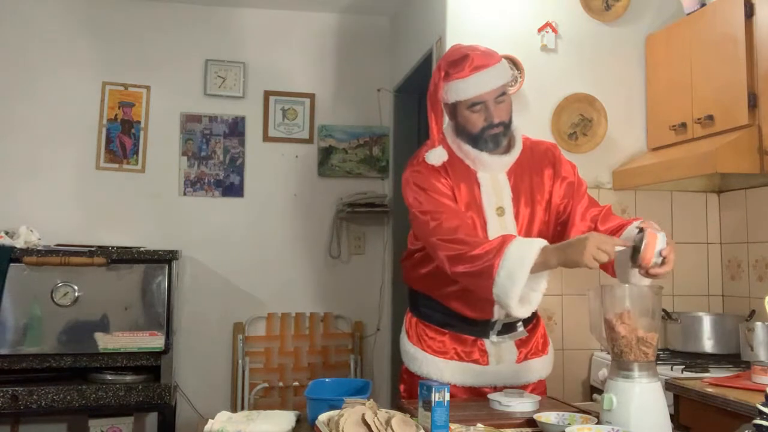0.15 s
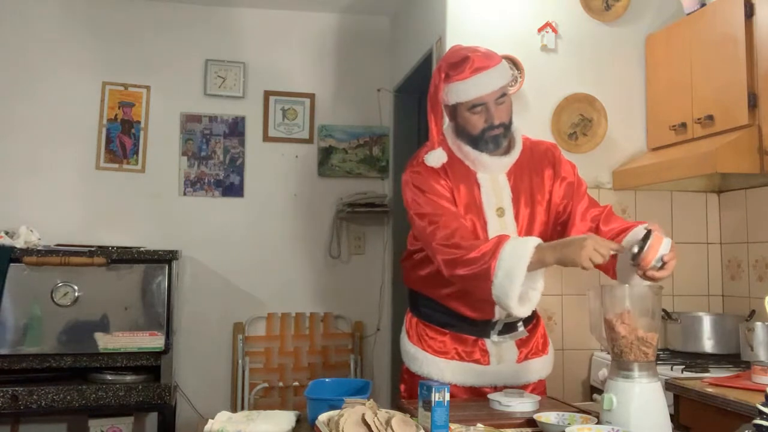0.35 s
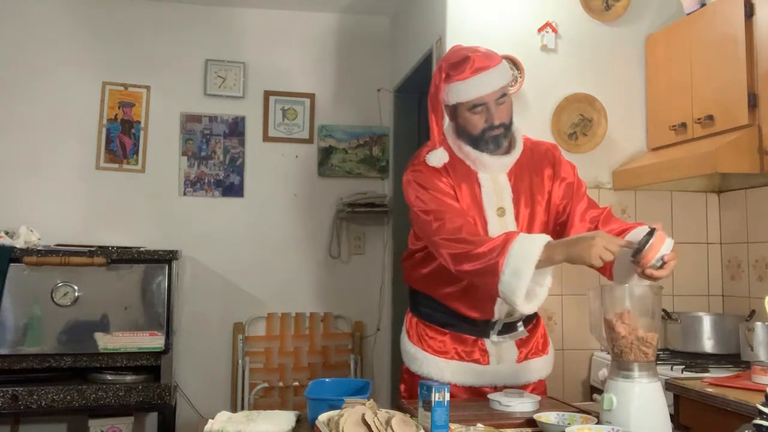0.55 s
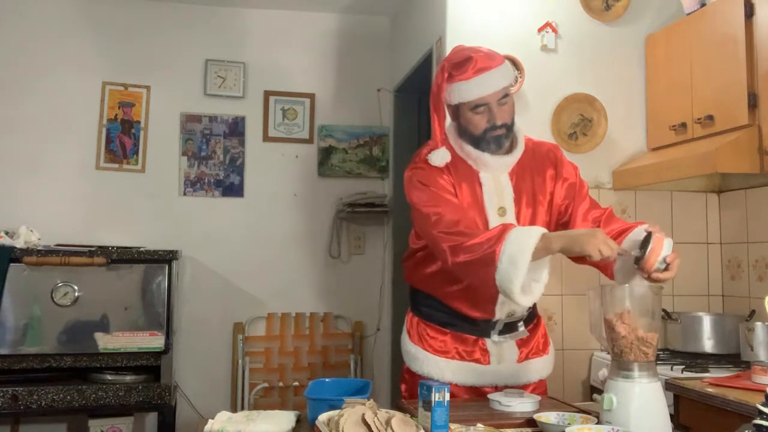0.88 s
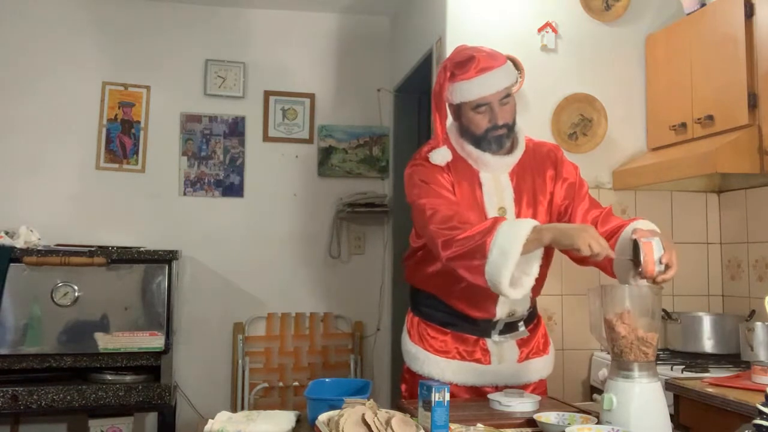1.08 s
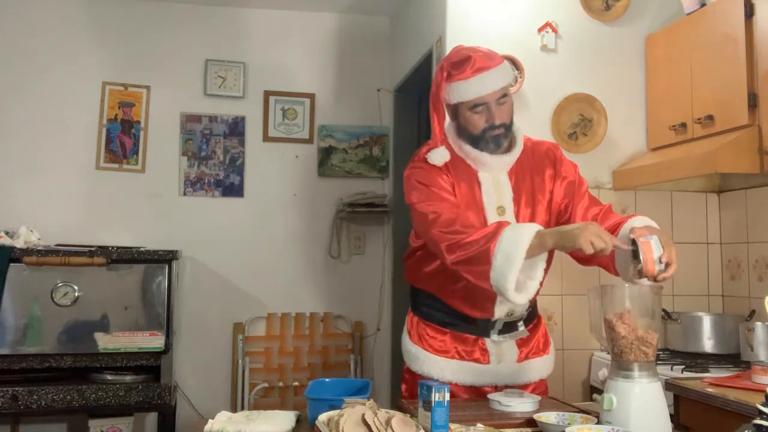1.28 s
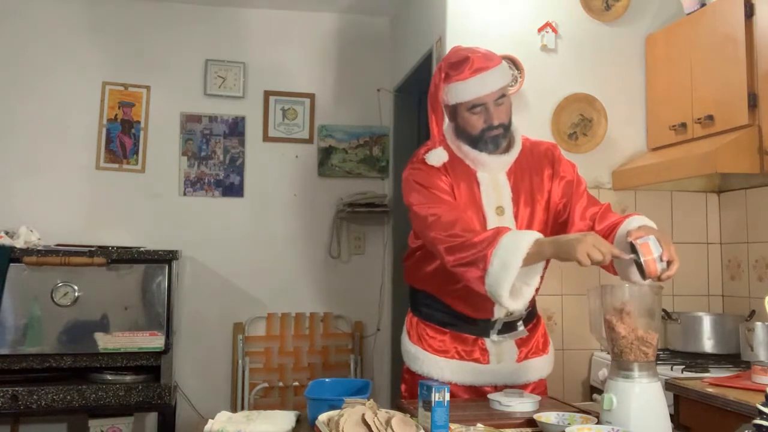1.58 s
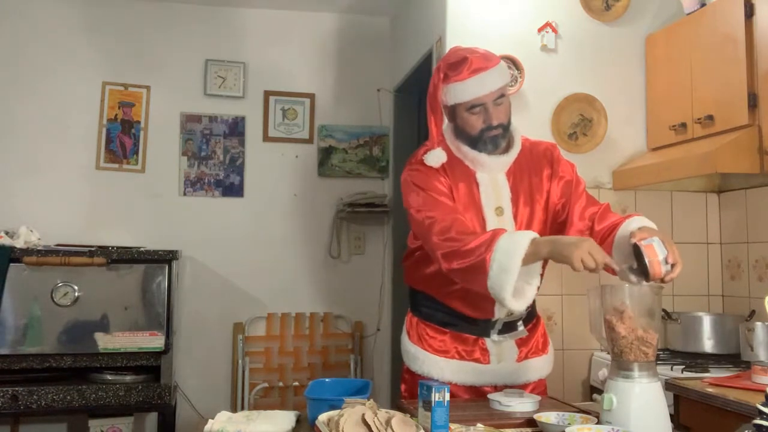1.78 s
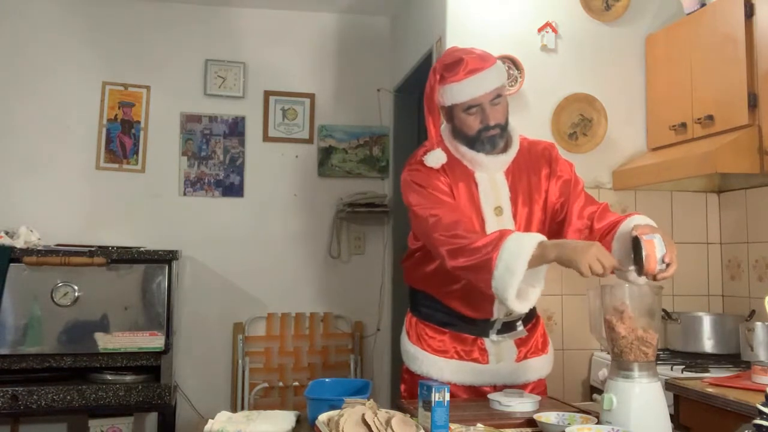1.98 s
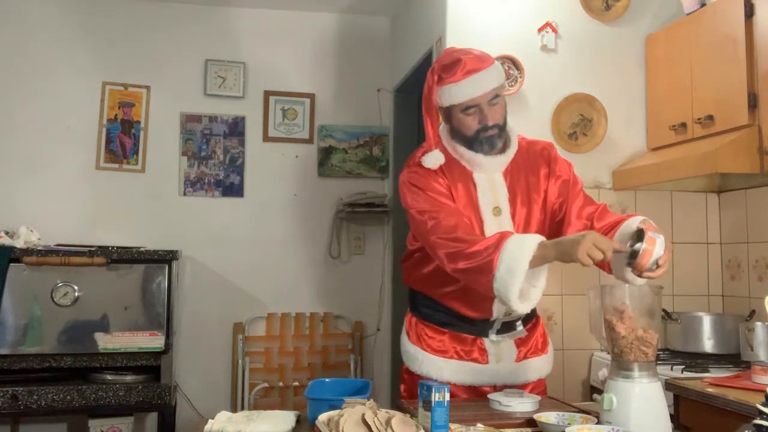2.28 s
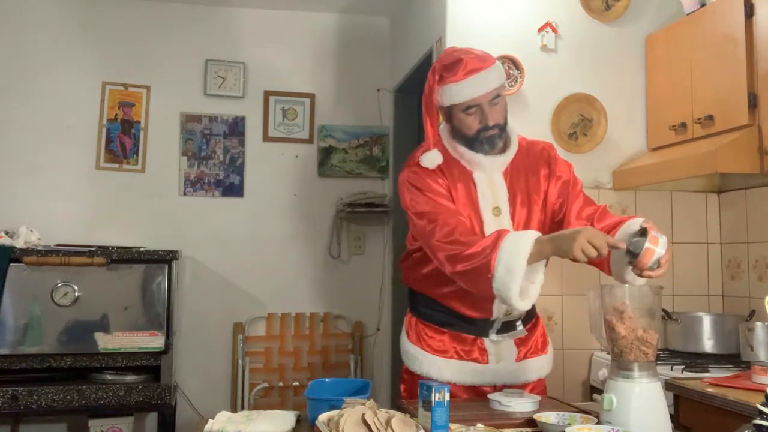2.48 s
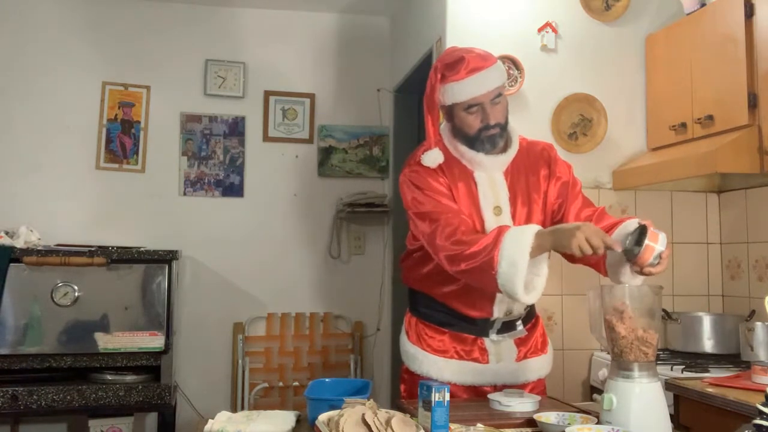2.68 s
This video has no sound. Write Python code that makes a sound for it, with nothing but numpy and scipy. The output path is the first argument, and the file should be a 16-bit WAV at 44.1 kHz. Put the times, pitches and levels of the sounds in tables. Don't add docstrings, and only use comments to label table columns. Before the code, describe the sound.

A metal spoon knocks a hand-held tin can at 0.15 and 0.52 seconds, each followed by a short scrape, then cracks against the seam at 0.8. Soft scooping comes near 1.3, a light wall brush at 1.65, a bump at 1.93, and a loud bright rim blow with a skid at 2.35. Tiles echo briefly over faint air and motor hum; the distant small microphone dulls the top.

```python
import sys
import numpy as np
from scipy import signal
from scipy.io import wavfile
from scipy.ndimage import uniform_filter1d

SR = 44100
rng = np.random.default_rng(int(sys.argv[2]) if len(sys.argv) > 2 else 0)


def digitize_waveform(pressure):
    field = np.atleast_2d(pressure).T
    bounded = np.clip(field, -1, 1)
    quanta = np.round(bounded * 32767).astype(np.int16)
    wavfile.write(sys.argv[1], SR, quanta)


def magnitude_from_level(level_db):
    exponent = np.asarray(level_db, float) / 20
    return 10 ** exponent


N = 125685
PIVOT_HZ = 1160


def evened(x):
    return x / np.sqrt(np.mean(x ** 2) + 1e-20)


def read(points, hz):
    f, value = np.transpose(points)
    return np.interp(np.log(hz + 1), np.log(f + 1), value)


def add(mix, s, sound):
    part = mix[round(s * SR):][:len(sound)]
    part += sound[:len(part)]


def colour(x, points, tilt_db=0):
    hz = abs(np.fft.fftfreq(4096, 1 / SR))
    gain_db = read(points, hz) + tilt_db * np.log2((hz + 50) / PIVOT_HZ)
    log_gain = np.log(magnitude_from_level(gain_db))
    taps = np.fft.ifft(np.exp(np.conj(signal.hilbert(log_gain)))).real[:2048]
    return signal.oaconvolve(x, taps)[:len(x)]


# pitch in Hz, level in dB per Hz.
AIR_SPECTRUM = [(30, -16), (70, -12), (170, -2.5), (400, -10.5), (1200, -18.5), (3000, -28), (5500, -31.5),
                (7000, -35)]


def house_air():
    level_db, patch_db = -61.5, 1
    frames, hz = N // 512 + 5, np.fft.rfftfreq(2048, 1 / SR)
    a, b, patches = rng.standard_normal((frames, 1025, 3)).T
    patches = uniform_filter1d(patches, size=10, axis=0)
    patches = evened(uniform_filter1d(patches, size=10, axis=1))
    size = magnitude_from_level(read(AIR_SPECTRUM, hz)[:, None] + patch_db * patches)
    air = signal.istft((a + 1j * b) * size, nperseg=2048, noverlap=1536)[1][:N]
    return magnitude_from_level(level_db) * evened(air)


# pitch in Hz, width of its wavering in Hz, level in dB.
HUM_TONES = [(101, 7.3, -70.5), (188.5, 5.1, -71), (310.4, 3.6, -70.5), (141, 1.5, -76.5)]


def appliance_hum():
    out = np.zeros(N)
    for hum_hz, width_hz, db in HUM_TONES:
        r = np.exp(-np.pi * width_hz / SR)
        p, q = rng.standard_normal((N, 2)).T
        slow = signal.lfilter([1], np.convolve([1, -r], [1, -r]), p + 1j * q)
        tone = (slow * np.exp(2j * np.pi * hum_hz * np.arange(N) / SR)).real
        out += magnitude_from_level(db) * evened(tone)
    return out


# pitch in Hz, time to fall by 60 dB in seconds.
KITCHEN_DECAY = [(200, 1), (1000, 0.55), (3000, 0.53), (7000, 0.47), (14000, 0.35)]


def kitchen_echoes():
    early_db, early_t60_s = 1.5, 0.17
    level_db, first_echo_s = -1.5, 0.004
    taps = np.zeros(SR)
    at = np.arange(0, SR - 8, 8)
    taps[at + rng.integers(0, 8, len(at))] = rng.choice([-1., 1.], len(at))
    hz, t, z = signal.stft(taps, SR, nperseg=256)
    late = magnitude_from_level(-60 * t / read(KITCHEN_DECAY, hz)[:, None])
    early = magnitude_from_level(early_db - 60 * t / early_t60_s)
    tail = signal.istft(z * (late + early), SR, nperseg=256)[1]
    return np.r_[np.zeros(round(first_echo_s * SR)), magnitude_from_level(level_db) * tail / np.linalg.norm(tail)]


# pitch in Hz, level in dB.
CRACK_SPECTRUM = [(60, -74.5), (200, 0.5), (500, 4), (1200, 8.5), (3000, 8.5), (6000, 6.5), (10000, -2.5),
                  (16000, 11)]


def crack(burst, tilt_db):
    return colour(burst, CRACK_SPECTRUM, tilt_db)


def ring(modes, tilt_db, rise_s, damping=1):
    sag_share, sag_s = 0.00794, 0.04
    t = np.arange(0, .45, 1 / SR)[:, None]
    hz, db, t60 = np.transpose(modes)
    size = magnitude_from_level(db + tilt_db * np.log2(hz / PIVOT_HZ) - 60 * t / (damping * t60))
    bent = t - sag_share * sag_s * np.exp(-t / sag_s)
    tones = size * np.sin(2 * np.pi * hz * bent + np.arange(len(hz)) ** 2)
    return tones.sum(1) * np.minimum(t[:, 0] / rise_s, 1)


def knock(modes, s, ring_db, crack_db, tilt_db, rise_s):
    crack_t60_s = 0.039
    t = np.arange(0, .45, 1 / SR)
    burst = rng.standard_normal(len(t)) * magnitude_from_level(-60 * t / crack_t60_s) * np.minimum(t / rise_s, 1)
    return s, magnitude_from_level(ring_db) * ring(modes, tilt_db, rise_s) + magnitude_from_level(crack_db) * crack(burst, tilt_db)


def drag(modes, s, length_s, ring_db, rasp_db, tilt_db):
    slips_per_s, spread_db, slip_rise_s = 2500, 3.2, 0.00078
    damping, peak, swell = 0.29, 0.86, 1.17
    sign, luck, chance = rng.random((8000, 3)).T
    slips = np.sign(sign - .5) * magnitude_from_level(-spread_db * np.log(luck + 0.014))
    slips = slips * (chance < slips_per_s / SR)
    progress = np.clip(np.arange(8000) / SR / length_s, 0, 1)
    stroke = abs(np.sin(np.pi * progress ** peak)) ** swell
    slips = np.pad(evened(slips) * stroke, (0, 4000))
    body = ring(modes, tilt_db, slip_rise_s, damping)
    rung = signal.fftconvolve(slips, body / np.linalg.norm(body))[:len(slips)]
    return s, magnitude_from_level(ring_db) * rung + magnitude_from_level(rasp_db) * crack(slips, tilt_db)


def touches(modes, knocks, drags=()):
    out = np.zeros(N)
    for row in knocks:
        add(out, *knock(modes, *row))
    for row in drags:
        add(out, *drag(modes, *row))
    return out


# pitch in Hz, level in dB, time to fall by 60 dB in seconds.
SCOOP_MODES = [(584, -9, 0.013), (1084, 6, 0.029), (1242, -2.5, 0.043), (1380, -5, 0.062), (2062, -6, 0.1),
               (2600, 2.5, 0.03), (3750, 1, 0.024), (4800, -9, 0.034)]
# start in seconds, ring in dB, crack in dB, brightness in dB per octave, rise in seconds.
SCOOP_TAPS = [
    (1.296, -62, -70, -6, 0.0011),
    (1.316, -45, -64, -9, 0.0014),
    (1.326, -52, -59, 1, 0.00075),
    (1.34, -52, -68, 3.5, .001),
    (1.362, -51.5, -70, -17, 0.0012),
    (1.385, -62, -70, -3, .0008),
]
# start and length in seconds, ring in dB, rasp in dB, brightness in dB per octave.
SCOOP_SCRAPES = [
    (1.285, 0.041, -61.5, -65, -12),
    (1.3, 0.072, -47, -55.5, -5.5),
    (1.325, 0.028, -44, -60, 0.5),
    (1.35, 0.049, -76, -61.5, -1.5),
]


def scoop():
    return touches(SCOOP_MODES, SCOOP_TAPS, SCOOP_SCRAPES)


# pitch in Hz, level in dB, time to fall by 60 dB in seconds.
TIP_MODES = [(1200, -18.5, .015), (2500, -4, .015), (3300, -3.5, .02), (3200, -16.5, .015), (5660, -3, .02),
             (5760, 4.5, .015), (6500, -11, .012)]
# start in seconds, ring in dB, crack in dB, brightness in dB per octave, rise in seconds.
TIP_TICKS = [
    (0.4866, -40, -40.5, 0.49, 0.00025),
    (0.7843, -40.5, -47, 0.66, 0.0003),
]


def tip():
    return touches(TIP_MODES, TIP_TICKS)


# pitch in Hz, level in dB, time to fall by 60 dB in seconds.
BOWL_MODES = [(960, 6, 0.031), (1067, 5.5, 0.051), (3954, -0.5, 0.057), (4730, -17, 0.026),
              (2870, -4.5, 0.06)]
# start in seconds, ring in dB, crack in dB, brightness in dB per octave, rise in seconds.
BOWL_BUMPS = [
    (0.606, -28, -44, -7, 0.0035),
    (1.995, -51.5, -71, 10, .002),
    (2.017, -53.5, -76, 9.5, 0.006),
    (2.051, -58, -59.5, 4.5, 0.0034),
]


def bowl():
    return touches(BOWL_MODES, BOWL_BUMPS)


# pitch in Hz, level in dB, time to fall by 60 dB in seconds.
LIP_MODES = [(1390, -0.5, 0.033), (2925, 0.5, 0.014), (3290, -8.5, 0.025), (4080, -3, .04), (5670, -3, .02),
             (6500, -5, .015)]
# start in seconds, ring in dB, crack in dB, brightness in dB per octave, rise in seconds.
LIP_TAP = [
    (2.2991, -35, -41, 0.082, 0.00073),
]


def lip():
    return touches(LIP_MODES, LIP_TAP)


# pitch in Hz, level in dB, time to fall by 60 dB in seconds.
WALL_MODES = [(245, -11.5, 0.042), (480, 6.5, 0.081), (769, -10.5, 0.0277), (1150, 1, 0.066),
              (1293, 3, 0.083), (1518, -4.5, 0.054), (2280, 1, 0.037), (2626, 5, 0.021),
              (3070, -12.5, 0.031), (3750, -9.5, 0.091), (3730, -12, 0.09), (5400, -23, .03)]
# start in seconds, ring in dB, crack in dB, brightness in dB per octave, rise in seconds.
WALL_HITS = [
    (1.634, -57, -43, -7.5, .0005),
    (1.6457, -36.5, -57, 1, 0.0021),
]
# start and length in seconds, ring in dB, rasp in dB, brightness in dB per octave.
WALL_SCRAPES = [
    (1.648, 0.041, -54, -43.5, -2.5),
]


def wall():
    return touches(WALL_MODES, WALL_HITS, WALL_SCRAPES)


# pitch in Hz, level in dB, time to fall by 60 dB in seconds.
SHOULDER_MODES = [(194, -9, 0.038), (448, -5.5, 0.065), (487.5, 2.5, 0.067), (1127, -1, 0.069),
                  (1256, -4, 0.12), (1309, 4.5, 0.068), (1437, -10.5, 0.088), (1920, -7.5, 0.056),
                  (2270, -1.5, 0.046), (2454, -14, 0.078), (3107, -9, 0.091), (3670, -15.5, 0.066),
                  (4070, -7, 0.026), (5580, -11.5, 0.052)]
# start in seconds, ring in dB, crack in dB, brightness in dB per octave, rise in seconds.
SHOULDER_HITS = [
    (1.91, -51.5, -47.5, -7.5, 0.0022),
    (1.928, -33.5, -29, -0.2, 0.0015),
    (1.973, -38, -47, 2.5, 0.0056),
]
# start and length in seconds, ring in dB, rasp in dB, brightness in dB per octave.
SHOULDER_SCRAPES = [
    (1.917, 0.04, -43.5, -44, -2.1),
    (1.954, 0.075, -51.5, -48.5, 0.8),
]


def shoulder():
    return touches(SHOULDER_MODES, SHOULDER_HITS, SHOULDER_SCRAPES)


# pitch in Hz, level in dB, time to fall by 60 dB in seconds.
SEAM_MODES = [(437, -14.5, 0.086), (953, -15, 0.073), (1139, 0.5, 0.12), (1211, -2.5, 0.14),
              (1720, -3.5, 0.057), (2106, -5.5, 0.03), (2963, -5, 0.037), (3190, -18, 0.022),
              (3790, -4.5, 0.035), (4260, -0.5, 0.029), (5080, -19, 0.1), (5360, -7.5, 0.055),
              (7170, -18, 0.1), (7710, -29, .04)]
# start in seconds, ring in dB, crack in dB, brightness in dB per octave, rise in seconds.
SEAM_HITS = [
    (0.8064, -21, -22, 0.46, 0.0024),
    (0.913, -42, -43.5, 4.1, 0.00046),
]
# start and length in seconds, ring in dB, rasp in dB, brightness in dB per octave.
SEAM_SCRAPES = [
    (0.861, 0.065, -49, -45, 2.47),
]


def seam():
    return touches(SEAM_MODES, SEAM_HITS, SEAM_SCRAPES)


# pitch in Hz, level in dB, time to fall by 60 dB in seconds.
FLANK_MODES = [(1727, -3.5, 0.036), (2176, -2, 0.032), (2270, -5.5, 0.032), (2510, -10.5, .15),
               (2640, -15, 0.03), (2944, -12, 0.031), (3140, -12, 0.071), (3360, -17.5, .08),
               (4230, -23.5, .05), (4270, -13.5, 0.029), (5580, -14, 0.043), (6310, -16.5, 0.032),
               (7190, -19.5, .06), (8660, -31, .04)]
# start in seconds, ring in dB, crack in dB, brightness in dB per octave, rise in seconds.
FLANK_HITS = [
    (0.1524, -21.5, -55, 0.1, 0.0017),
]
# start and length in seconds, ring in dB, rasp in dB, brightness in dB per octave.
FLANK_SCRAPES = [
    (.2, 0.13, -47.5, -59.5, 3.4),
]


def flank():
    return touches(FLANK_MODES, FLANK_HITS, FLANK_SCRAPES)


# pitch in Hz, level in dB, time to fall by 60 dB in seconds.
HEEL_MODES = [(1707, 0, 0.039), (2060, -4, 0.033), (2900, -7, 0.034), (3130, -16, 0.062), (3770, -10, .06),
              (3830, -6, 0.036), (4230, -9, 0.071), (4640, -12, .06), (5620, -10.5, 0.039),
              (5630, -15.5, .06), (6600, -22.5, .05), (6150, -25, .06), (7500, -35.5, .05),
              (8350, -12, .03)]
# start in seconds, ring in dB, crack in dB, brightness in dB per octave, rise in seconds.
HEEL_HITS = [
    (0.5216, -22.5, -62, .1, 0.00076),
]
# start and length in seconds, ring in dB, rasp in dB, brightness in dB per octave.
HEEL_SCRAPES = [
    (0.597, 0.041, -55, -43, 1.8),
]


def heel():
    return touches(HEEL_MODES, HEEL_HITS, HEEL_SCRAPES)


# pitch in Hz, level in dB, time to fall by 60 dB in seconds.
BRIM_MODES = [(3470, -1, 0.043), (3430, 0, 0.032), (3870, -3, 0.068), (4120, -6.5, 0.062),
              (4080, -11, 0.042), (5290, -2.5, .05), (5450, -2.5, 0.031), (5960, -18.5, .05),
              (6597, -9.5, 0.037), (6830, -0.5, 0.05), (7450, 4.5, 0.045), (7760, -1.5, 0.026),
              (8750, -5.5, 0.019)]
# start in seconds, ring in dB, crack in dB, brightness in dB per octave, rise in seconds.
BRIM_HITS = [
    (2.3559, -29, -60, .1, 0.00056),
    (2.378, -39, -51, .1, .002),
]
# start and length in seconds, ring in dB, rasp in dB, brightness in dB per octave.
BRIM_SCRAPES = [
    (2.359, 0.023, -36.5, -44, 0.087),
]


def brim():
    return touches(BRIM_MODES, BRIM_HITS, BRIM_SCRAPES)


# pitch in Hz, level in dB, time to fall by 60 dB in seconds.
RIM_MODES = [(562, -22.5, 0.058), (789, -11, 0.022), (1080, -11, 0.15), (1123, -3, 0.052),
             (1279, -10, 0.16), (1220, -3, 0.12), (1312, -5.5, 0.15), (1442, -1, 0.13), (1516, -10, 0.024),
             (1936, -4, 0.09), (2760, -9, 0.053), (2884, -12.5, 0.056), (2970, -16.5, 0.081)]
# start in seconds, ring in dB, crack in dB, brightness in dB per octave, rise in seconds.
RIM_HITS = [
    (2.344, -43.5, -51, 4.5, 0.0034),
    (2.355, -14, -22.5, 1.9, 0.00069),
]
# start and length in seconds, ring in dB, rasp in dB, brightness in dB per octave.
RIM_SCRAPES = [
    (2.364, 0.046, -45.5, -32.5, 0.69),
]


def rim():
    return touches(RIM_MODES, RIM_HITS, RIM_SCRAPES)


# pitch in Hz, level in dB, time to fall by 60 dB in seconds.
BASE_MODES = [(316, -12, 0.049), (441, -20.5, 0.18), (698, -27.5, 0.0856), (816, -14, 0.11),
              (966, -4.5, 0.029), (1070, -18.5, .08), (1112, -9, 0.22), (1154, -3.5, 0.2), (1206, 4, 0.088),
              (1207, -19.5, 0.097), (1286, -22.5, 0.043)]
# start in seconds, ring in dB, crack in dB, brightness in dB per octave, rise in seconds.
BASE_HITS = [
    (0.1522, -16, -32.5, 1.66, 0.0018),
    (0.52, -16.5, -31.5, 2, 0.00044),
]
# start and length in seconds, ring in dB, rasp in dB, brightness in dB per octave.
BASE_SCRAPES = [
    (0.198, 0.083, -58, -44, 0.5),
    (0.594, 0.011, -59, -36.5, 0.5),
]


def base():
    return touches(BASE_MODES, BASE_HITS, BASE_SCRAPES)


def can():
    soft = scoop() + tip() + bowl() + lip() + wall() + shoulder()
    hard = seam() + flank() + heel() + brim() + rim() + base()
    low_cut = signal.butter(4, 140, "high", fs=SR, output="sos")
    return signal.sosfilt(low_cut, soft + hard)


def scene():
    sway_per_s = 1.703
    tin = can()
    turn = np.pi * sway_per_s * np.arange(N) / SR
    wet = np.zeros(N)
    for k in range(3):
        facing = np.cos(turn + k * np.pi / 3)
        wet += signal.fftconvolve(tin * facing, kitchen_echoes())[:N]
    return (tin + np.sqrt(2 / 3) * wet + house_air() + appliance_hum())[None]


# pitch in Hz, gain in dB.
MIC_COLOUR = [(4200, 3.5), (4700, -1.5), (5600, 2.5), (7400, 5.5), (8000, -8), (8800, -0.5), (12500, -12),
              (16500, -28.5)]
# pitch in Hz, level in dB.
MIC_HISS = [(3000, -87), (9000, -91), (15000, -70)]


def microphone(sound):
    knee, edge_hz = 1.4, 15760
    heard = knee * np.tanh(colour(sound, MIC_COLOUR) / knee)
    heard = heard + colour(rng.standard_normal(N), MIC_HISS)
    return signal.oaconvolve(heard, signal.firwin(767, edge_hz, fs=SR), "same")


def band_limit(x):
    return signal.sosfilt(signal.butter(12, 16950, fs=SR, output="sos"), x)


def record(dry):
    mix = microphone(dry[0])[None]
    return band_limit(mix)


dry = scene()
out = record(dry)
digitize_waveform(out)
```